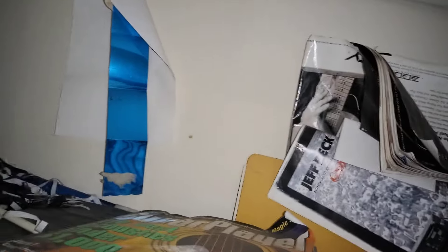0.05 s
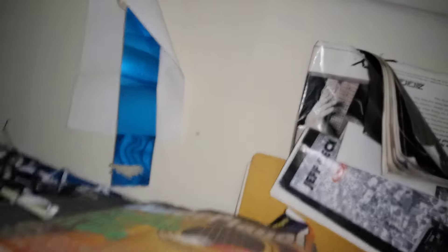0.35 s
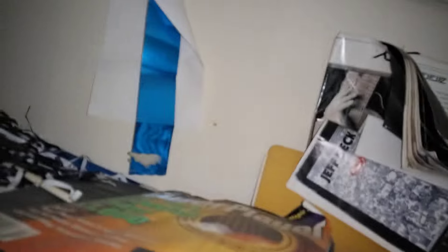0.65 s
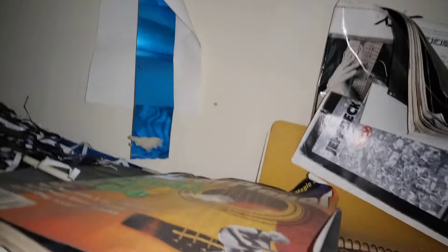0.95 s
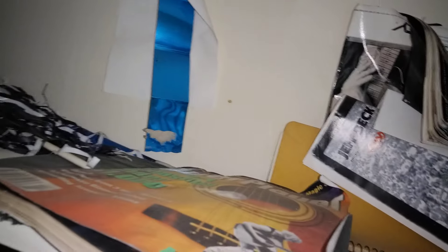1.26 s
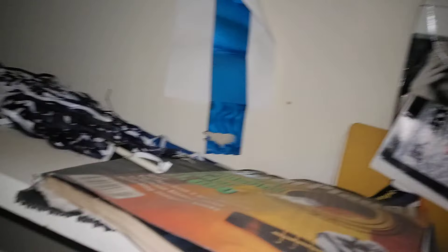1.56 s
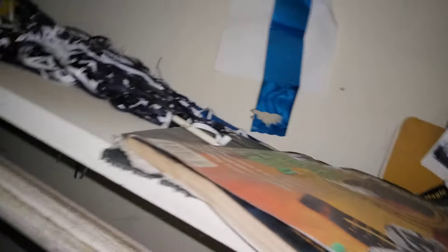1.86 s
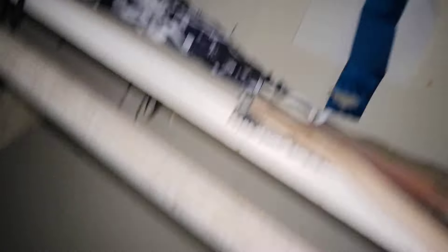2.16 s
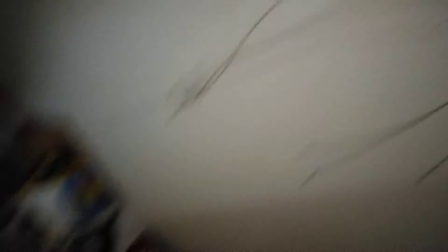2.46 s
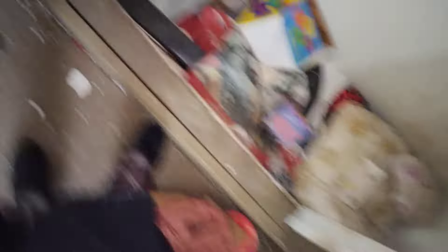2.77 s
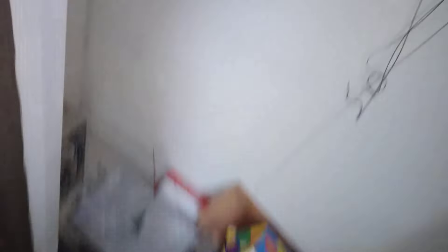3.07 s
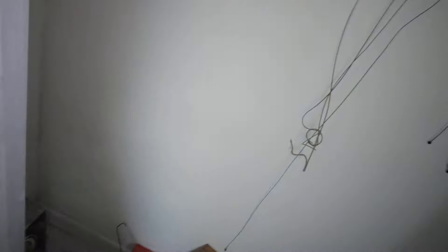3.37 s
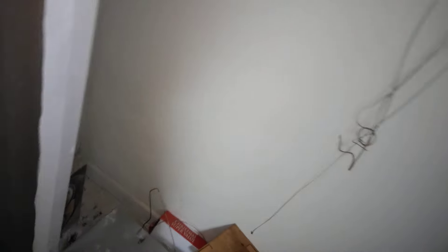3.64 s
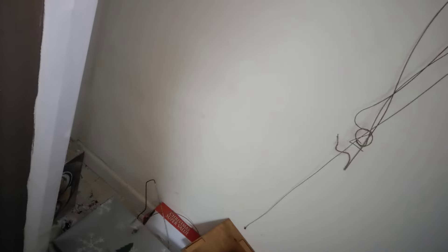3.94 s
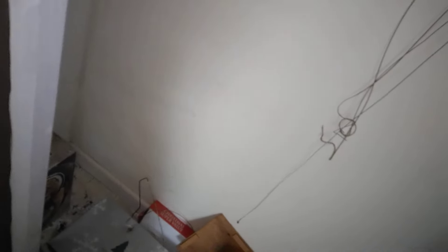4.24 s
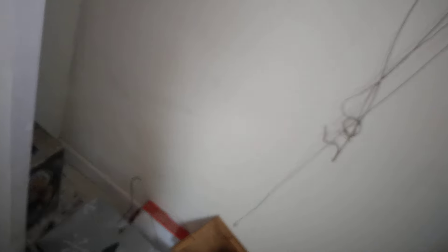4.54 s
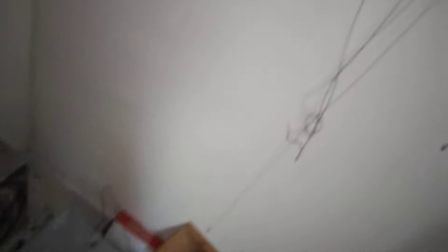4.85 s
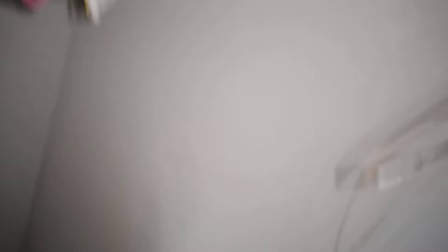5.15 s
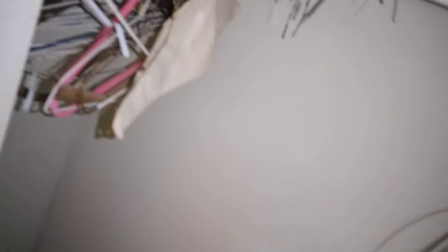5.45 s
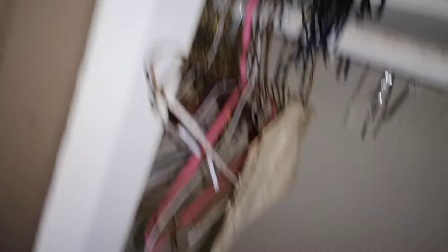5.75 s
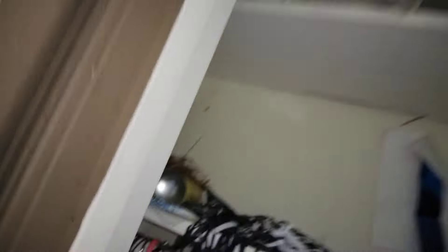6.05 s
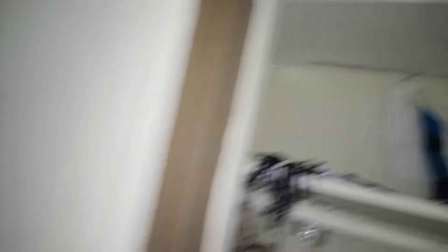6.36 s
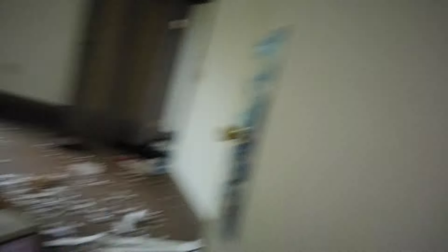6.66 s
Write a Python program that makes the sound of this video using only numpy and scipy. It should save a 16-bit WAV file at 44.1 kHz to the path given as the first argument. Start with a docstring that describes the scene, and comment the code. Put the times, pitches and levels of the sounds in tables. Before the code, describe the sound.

Plastic things tumble, magazines slide, clothes rustle and hangers clatter as someone rummages through a small closet.

```python
"""Rummaging in a small closet, a phone in one hand: plastic things tumble on a shelf, a metal piece bounces,
a box knocks, boards thud, hangers clack and clatter on their rail. A blow is a click, a rattle and ringing
modes. Magazines slide and clothes rustle by stick and slip, their creases snapping. Short delayed copies
from the phone, the hand and nearby surfaces make the sound hollow; the walls echo.
Fingers tap and rub the phone's case, mostly at the end."""
import sys
import numpy as np
from scipy import signal
from scipy.fft import rfft, irfft, next_fast_len
from scipy.io import wavfile

SR = 44100
rng = np.random.default_rng(int(sys.argv[2]) if len(sys.argv) > 2 else 0)


def put_to_file(sound):
    """Save the sound as 16-bit audio at rate SR, in the file named by the first command-line argument."""
    columns = np.atleast_2d(sound).T  # one column per channel
    safe = np.clip(columns, -1, 1)
    whole_steps = np.round(safe * 32767)
    wavfile.write(sys.argv[1], SR, whole_steps.astype(np.int16))


N = 304731

# short delayed copies from phone, hand and nearby surfaces: left_ms, left_db, right_ms, right_db
SHORT_DELAYS = [(0.884, -31.5, 0.9, -28.5), (1.519, -22.5, 2.3, -25), (3.265, -26.5, 1.2, -24),
                (4.671, -26, 2.1, -25), (10.113, -22.5, 4.2, -22.5)]


def amp(db):
    return 10 ** (np.asarray(db) / 20)


def panned(level_db, pan_db):
    """Stereo gains; pan_db is left minus right."""
    return amp(level_db + np.array([[pan_db], [-pan_db]]) / 2)


def read(points, hz):
    """Interpolates (freq_hz, value) points on a log-frequency axis."""
    f, value = np.transpose(points)
    return np.interp(np.log(hz + 1), np.log(f + 1), value)


def unit(x):
    """Unit energy per channel."""
    return x / np.sqrt((x ** 2).sum(-1, keepdims=True) + 1e-20)


def decay(t, t60_s):
    return np.exp(-np.log(1000) * t / t60_s)


def add(mix, start_s, sound):
    part = mix[:, max(round(start_s * SR), 0):][:, :sound.shape[1]]
    part += sound[:, :part.shape[1]]


def colour(x, points, size=4096):
    """Causal filter from (freq_hz, gain_db) points."""
    log_gain = np.log(amp(read(points, abs(np.fft.fftfreq(size, 1 / SR)))))
    taps = np.fft.ifft(np.exp(np.conj(signal.hilbert(log_gain)))).real[:size // 2]
    return signal.oaconvolve(x, taps[None], axes=1)[:, :x.shape[1]]


def diffuse(count):
    """White noise at two microphone ports: alike in the bass, unrelated in the treble."""
    likeness = [(60, 1), (220, 0.6), (450, 0.3), (900, .05), (4000, 0)]  # between ports: freq_hz, correlation
    size = next_fast_len(count)
    a, b = rfft(rng.standard_normal((2, size)))
    same = read(likeness, np.fft.rfftfreq(size, 1 / SR))
    return irfft(np.array([a, same * a + np.sqrt(1 - same ** 2) * b]), size)[:, :count]


def wander(count, rate_hz):
    """Gaussian random points at rate_hz, joined by lines."""
    at = np.arange(count) * rate_hz / SR
    return np.interp(at, np.arange(count), rng.standard_normal(count))


def ring(waves):
    """Sums modes; the place of a blow sets each one's phase at each port, here at random."""
    return (np.exp(2j * np.pi * rng.random((2, len(waves)))) @ waves).real


def strike(blows, modes, ring_db, click_db, grain_db, lead_ms, rise_ms, sub_db, bass_db, pan_db,
           t60_scale=1, size=16384):
    """Contact click, dying rattle of tiny contacts and ring; t60_scale < 1: a hand or neighbour damps it."""
    out, t = np.zeros((2, N)), np.arange(size) / SR
    mode_hz, mode_db, mode_t60_s = np.transpose(modes)[:, :, None]
    waves = np.exp(2j * np.pi * mode_hz * t) * decay(t, mode_t60_s * t60_scale)
    waves *= amp(mode_db + ring_db) / np.linalg.norm(waves.real, axis=1, keepdims=True)
    arrival_s = .001 + np.array([[-lead_ms], [lead_ms]]) / 2000
    click = amp(click_db) * np.sinc((t - arrival_s) * SR)
    rise = 1 - np.exp(-t * 1000 / rise_ms)
    for start_s, level_db, weight_db, treble_db, t60_s in blows:
        rattle = diffuse(size) * amp(grain_db * wander(size, 900)) * decay(t, t60_s)
        hit = unit(unit(rattle * rise) + click + ring(waves) * rise) * np.sqrt(SR / 100)
        low_db = weight_db + bass_db  # a heavy, soft blow lifts body and bass against 2 kHz
        hardness = [(35, low_db + sub_db), (110, low_db - 4.5), (250, low_db + 4),
                    (680, weight_db), (2000, 0.0026), (5500, treble_db)]
        add(out, start_s, colour(hit, hardness) * panned(level_db, pan_db))
    return out


def crowded_modes(x, ripple_db, spacing_hz):
    """Many short, overlapping modes of a light, irregular object: fixed treble peaks and notches."""
    hz = np.arange(1, 401) * spacing_hz
    depth_db = ripple_db * np.clip((hz - 700) / 2000, 0, 1)
    draws = np.clip(rng.standard_normal(len(hz)), -2.5, 1.5)
    gain_db = depth_db * draws - depth_db ** 2 * np.log(10) / 25
    return colour(x, np.column_stack([hz, gain_db]))


def comb(x, delays, strength_db):
    """Short delayed copies, from the phone and hand as well as nearby surfaces, make the sound hollow."""
    rows, lag = np.array(delays), np.arange(512)
    ms, db = rows[:, ::2].T[:, :, None], rows[:, 1::2].T[:, :, None]
    taps = (amp(db + strength_db) * np.sinc(lag - ms * SR / 1000)).sum(1) + (lag == 0)
    return signal.oaconvolve(x, unit(taps), axes=1)[:, :N]


def strokes(start_s, length_s, level_db, rise_db_per_s, fall_db_per_s, arch_db):
    """Rubbing envelope: each stroke gathers speed, peaks midway and dies away."""
    t = np.arange(0, N, 64)[:, None] / SR
    early_s, late_s = np.maximum(start_s - t, 0), np.maximum(t - start_s - length_s, 0)
    off_centre = np.clip(2 * (t - start_s) / length_s - 1, -1, 1)
    each = amp(level_db - arch_db * off_centre ** 2 - rise_db_per_s * early_s - fall_db_per_s * late_s)
    return np.interp(np.arange(N) / SR, t[:, 0], np.linalg.norm(each, axis=1))


def crinkle(snaps_per_s=45, snap_db=-2.5, spread_db=3.5, decay_s=.0015):
    """Gain of a rubbed sheet: one, with a brief leap as each crease snaps."""
    sizes = amp(snap_db + spread_db * np.minimum(rng.exponential(1, N), 2))
    snaps = sizes * (rng.random(N) < snaps_per_s / SR)
    return 1 + signal.lfilter([1], [1, -np.exp(-1 / (decay_s * SR))], snaps)


def quiet_house():
    """Steady, faint, bass-heavy noise."""
    spectrum = [(20, -62), (70, -63.5), (200, -72), (600, -80.5), (2000, -86), (8000, -92), (16000, -100)]  # freq_hz, gain_db
    return colour(diffuse(N), spectrum)


def sliding_magazines(grain_db=2, flutter_db=1.5, pan_db=-1):
    """Paper and plastic stick and slip: grainy surface hiss, hollow drumming of the shelf."""
    slides = [(0.012, 0.46, -48, -43), (0.826, 0.081, -45, -51), (0.996, 0.11, -48, -70),
              (1.208, 0.056, -41.5, -32.5), (1.444, 0.055, -38, -29.5), (1.528, 0.072, -41.5, -26.5),
              (1.67, 0.12, -47.5, -44.5), (1.769, 0.029, -28.5, -17), (1.83, 0.028, -26, -12),
              (2.055, 0.07, -63.5, -43.5), (2.245, 0.035, -51, -42), (3.104, 0.26, -52.5, -51.5),
              (3.55, 0.06, -39.5, -66), (4.28, 0.053, -53, -74), (4.342, 0.12, -39.5, -40),
              (4.49, 0.31, -48, -41), (5.005, 0.027, -51, -65), (5.079, 0.13, -56.5, -39),
              (5.261, 0.021, -48, -59), (5.56, 0.3, -66, -59), (6.26, 0.23, -61.5, -57.5),
              (6.53, 0.032, -55.5, -48), (6.686, 0.1, -49, -45), (6.831, 0.048, -31.5, -31.5)]  # start_s, length_s, hiss_db, shelf_db
    hiss_spectrum = [(100, -22), (600, -7), (1600, -2.5), (2400, -1.5), (3600, -2), (7000, -2), (10000, 0),
                     (16000, 3)]  # freq_hz, gain_db
    shelf_spectrum = [(25, -21), (55, -16), (90, -9), (135, -8), (205, 5.5), (245, 0.5), (290, 10),
                      (350, -1), (460, -1), (635, 2.5), (780, -1.5), (880, -1), (1400, -7.5), (8000, -48.5)]  # freq_hz, gain_db
    sides = [(0, 3.5), (1.9, -1), (2.6, -4), (4.4, -1.5), (6.3, 1), (6.7, -1.5), (6.84, -13)]  # ends with a finger at the right port: time_s, pan_db
    start_s, length_s, hiss_db, shelf_db = np.transpose(slides)
    shape = dict(rise_db_per_s=420, fall_db_per_s=260, arch_db=2.5)
    grip = amp(flutter_db * wander(N, 90))  # tightens and lets go
    grain = amp(grain_db * wander(N, 2500))
    slips = diffuse(N) * grain * grip * strokes(start_s, length_s, hiss_db - 1.5, **shape)
    pushes = diffuse(N) * grip * strokes(start_s, length_s, shelf_db - 3.5, **shape)
    side_db = pan_db + np.interp(np.arange(N) / SR, *np.transpose(sides))
    ports = amp(np.array([side_db, -side_db]) / 2)
    ports /= np.sqrt((ports ** 2).mean(0))
    return (colour(slips * crinkle(), hiss_spectrum) + colour(pushes, shelf_spectrum)) * ports


def plastic_pile():
    """Plastic things tumble on the shelf, damping each other."""
    blows = [(0.033, -46, 13, 1, 0.15), (0.101, -43, 14, 2, 0.12), (0.165, -44.5, 12.5, -4.5, 0.14),
             (0.237, -38, 4, 1, 0.09), (0.2595, -25.5, 3.5, 14.5, 0.089), (0.273, -5, -0.5, -0.5, 0.21),
             (0.287, -6, -0.5, -15, 0.14), (0.333, -23, 9.5, -3, 0.06), (0.362, -20, 11, -7.5, 0.47),
             (0.4, -22, 6.5, -1.5, 0.36), (0.4335, -9, 3, -9.5, 0.097), (0.452, 2, -6.5, -6.5, 0.2),
             (0.48, -3.5, -8, -12, 0.38), (0.534, -6, -4, -4.5, 0.1), (0.812, -36.5, 13, -41, 0.21),
             (0.918, -43.5, 13.5, -6, 0.18)]  # start_s, level_db, weight_db, treble_db, rattle_t60_s
    modes = [(208.6, -3, 0.5), (295, 1, 0.42), (363, -6.5, 0.16), (443, -4.5, 0.17), (664, 3, 0.33),
             (857, -5.5, 0.75), (1254, -6.5, 0.87), (1490, 0, 0.16), (1690, -3, 0.28), (1844, -4.5, 0.12),
             (2082, 1, 0.55), (2130, -2.5, 0.32), (2640, -2.5, 0.27), (3600, -4, 0.17), (4500, -1, 0.22),
             (4670, -3, 0.19), (4631, -6, 0.28), (5530, -5, 0.29), (5700, -7.5, 0.64), (5900, -2.5, 0.57),
             (7919, -6.5, 0.28), (8240, -4.5, 0.28)]  # pitch_hz, level_db, undamped_t60_s
    hits = strike(blows, modes, ring_db=-22.5, click_db=-11, grain_db=3, lead_ms=0.55, rise_ms=0.83,
                  sub_db=-21, bass_db=0, pan_db=-1, t60_scale=0.73)
    hits = crowded_modes(hits, ripple_db=3, spacing_hz=95)
    return comb(hits, SHORT_DELAYS, strength_db=2.5)


def closet_echo(x, onset_s=0.0059, size=49152):
    """Dense tail from the close walls."""
    spectrum = [(60, 5.5), (130, -7), (240, -5.5), (650, -4.5), (2000, -9.5), (7000, -8.5), (15000, -27.5)]  # freq_hz, gain_db
    decay_times = [(80, 0.99), (240, 0.33), (650, 0.51), (2000, 0.57), (6000, 0.37), (14000, 0.98)]  # freq_hz, t60_s
    hz, t, bands = signal.stft(diffuse(size), SR, nperseg=512)
    fade = unit(decay(t, read(decay_times, hz)[:, None]))
    bands *= fade * amp(read(spectrum, hz))[:, None] * np.sqrt(len(t) / size)
    tail = signal.istft(bands, SR, nperseg=512)[1]
    tail *= np.clip(np.arange(tail.shape[1]) / SR / onset_s, 0, 1) ** 2
    return signal.fftconvolve(x, tail, axes=1)[:, :N]


def metal_piece(scrape_db=-4.5, scrape_t60_s=0.096, size=16384):
    """A few bounces, each a bright scrape that rings the same high modes."""
    bounces = [(.605, -30), (0.609, -20.5), (0.623, -22), (.631, -30.5)]  # start_s, level_db
    modes = [(5830, -7.5, 0.29), (6130, -3, 0.062), (5886, -1.5, 0.079), (6420, -16.5, 0.24),
             (7060, -15, 0.11), (9500, -23, 0.12), (11300, -12, 0.12), (12300, -3, 0.09)]  # pitch_hz, level_db, t60_s
    out, t = np.zeros((2, N)), np.arange(size) / SR
    mode_hz, mode_db, t60_s = np.transpose(modes)[:, :, None]
    waves = amp(mode_db) * np.exp(2j * np.pi * mode_hz * t) * decay(t, t60_s)
    for start_s, level_db in bounces:
        scrape = colour(diffuse(size), [(2000, -25), (6000, -1)]) * amp(scrape_db) * decay(t, scrape_t60_s)
        add(out, start_s, amp(level_db) * (scrape + ring(waves)))
    return out


def box_knocks():
    """Sharp contacts ring a box's short modes."""
    blows = [(1.125, -66.5, 8, 21, 0.17), (1.315, -38, 0.5, -12, 0.13), (2.063, -48.5, -1.5, -11, 0.24),
             (2.158, -50, 7, -3, 0.17), (2.222, -67, 2, 11, 0.023), (2.672, -49.5, 16, -13, 0.043),
             (3.235, -46.5, 9, 1, 0.027), (3.25, -40.5, 17.5, 3.5, 0.044), (3.292, -13, 5.5, -14, 0.069),
             (3.396, -33, 21.5, 3, 0.064), (3.704, -38, -5, -5.5, 0.16), (5.399, -53, 13.5, 3.5, 0.015),
             (6.073, -26.5, 6, -16, 0.032), (6.113, -45, 22, 9.5, 0.034), (6.235, -43.5, 11.5, -8.5, 0.013)]  # start_s, level_db, weight_db, treble_db, rattle_t60_s
    modes = [(370, -0.5, 0.041), (552, 0, 0.084), (666, -3.5, 0.076), (1193, -22, 0.11),
             (1915, -2.5, 0.031), (2660, -2, 0.0157), (3517, 3.5, 0.016), (5900, -21, 0.054),
             (7280, 3.5, 0.015)]  # pitch_hz, level_db, t60_s
    body = [(800, -2.5), (1110, -3), (1260, 0.5), (1550, -16), (1930, 3.5), (2550, -5), (3000, 4),
            (4800, 0), (6500, 1)]  # freq_hz, gain_db
    delays = [(1.519, -23, 0.64, -17), (2.268, -35, 1.35, -66), (3.129, -19, 1.6, -2.5),
              (3.333, -22, 3.8, 14), (5.193, -30, 2.7, -28)]  # left_ms, left_db, right_ms, right_db
    hits = strike(blows, modes, ring_db=-16, click_db=-3, grain_db=-1, lead_ms=-0.28, rise_ms=0.17,
                  sub_db=-26.5, bass_db=-3, pan_db=-4)
    return comb(colour(hits, body), delays, strength_db=5.5)


def clothes(grain_db=3, flutter_db=1.4):
    """Cloth drags over cloth as the body turns: a soft, grainy swish."""
    swishes = [(2.36, 0.65, -48), (3.196, 0.47, -47), (3.726, 0.22, -65)]  # start_s, length_s, level_db
    spectrum = [(40, -8.5), (100, 1.5), (170, -2), (380, 8.5), (600, 5), (1100, -1.5), (3000, 2.5),
                (4200, -4), (10000, -3.5), (16000, 0.5)]  # freq_hz, gain_db
    speed = strokes(*np.transpose(swishes), rise_db_per_s=198, fall_db_per_s=130.5, arch_db=5)
    fibres = diffuse(N) * amp(grain_db * wander(N, 2500) + flutter_db * wander(N, 70))
    return colour(fibres * speed * crinkle(), spectrum) * panned(level_db=-2.5, pan_db=-3)


def case_taps():
    """Fingers click on the phone's case, near the right port."""
    blows = [(2.373, -48, 14.5, 5, 0.0062), (6.39, -26, 11, 1, 0.0054), (6.698, -45, 9, -3, 0.018),
             (6.74, -37.5, 7.5, 7, 0.012), (6.83, -24, 3, 6, 0.023), (6.839, -30.5, -8, 15.5, 0.069),
             (6.878, -32.5, 19.5, 15, 0.031), (6.899, -35, 8, -14, 0.0088)]  # start_s, level_db, weight_db, treble_db, rattle_t60_s
    modes = [(198, 18, 0.018), (420, -46, .015), (6800, -4, .006)]  # pitch_hz, level_db, t60_s
    return strike(blows, modes, ring_db=-29, click_db=1.5, grain_db=5.5, lead_ms=-0.091, rise_ms=1,
                  sub_db=-13, bass_db=-1.5, pan_db=-15)


def soft_bumps(swell_s=0.0052, size=8192):
    """The hand or shifting feet swing the phone for a cycle or two."""
    pushes = [(2.694, -58.5, 219), (2.728, -54.5, 100), (3.762, -67, 101), (3.839, -64, 103),
              (6.429, -57.5, 77.5), (6.553, -53, 91.2), (6.643, -53.5, 98), (6.665, -47.5, 100),
              (6.779, -50, 152), (6.797, -49, 172), (6.881, -38, 107), (6.902, -25, 187)]  # peak_s, level_db, pitch_hz
    out, t = np.zeros((2, N)), np.arange(size) / SR
    swell = t / swell_s * np.exp(1 - t / swell_s)
    for peak_s, level_db, pitch_hz in pushes:
        swing = swell * np.sin(2 * np.pi * pitch_hz * t)
        add(out, peak_s - swell_s, swing * panned(level_db + 0.5, pan_db=-16.5))
    return out


def hanger_clacks():
    """Hangers clack with a damped ring."""
    blows = [(4.337, -25.5, -6.5, 0, 0.14), (4.546, -14, 0, 8, 0.051), (4.569, -19.5, 4.5, 8, 0.14),
             (4.818, -37.5, 12.5, -4, 0.1), (4.833, -43, 16.5, 8, 0.17), (4.877, -34, 11.5, 1, 0.22),
             (4.909, -34.5, -12, 6.5, 0.017)]  # start_s, level_db, weight_db, treble_db, rattle_t60_s
    modes = [(366.4, -9, 1), (669.7, -1.5, 0.39), (887, -1, 0.77), (1043, -3, 1), (1350, -3, 0.55),
             (2060, -11, 0.91), (2150, 0.5, 0.51), (2280, -7.5, 0.28), (3120, 1.5, 0.1), (3236, -8, 0.33),
             (2674, -2.5, 0.38), (3540, 7.5, 0.13), (3800, -11.5, 0.56), (4530, -2, 0.097),
             (4500, -8, 0.34), (5500, -4, 0.61), (5830, -7.5, 0.31), (6530, 4, 0.21), (7750, -9, 0.26),
             (8700, -3, 0.47), (9260, -13, 0.24)]  # pitch_hz, level_db, undamped_t60_s
    delays = [(0.883, -23, 0.904, -15.5), (1.111, -17, 1.3, -16.5), (1.315, -12.5, 1.9, -7),
              (1.519, -10.5, 1.519, -35), (1.723, -23, 4.9, -22.5)]  # left_ms, left_db, right_ms, right_db
    hits = strike(blows, modes, ring_db=-18, click_db=-24, grain_db=0, lead_ms=0.78, rise_ms=0.83,
                  sub_db=-13, bass_db=-8, pan_db=-4.5, t60_scale=0.45)
    hits = crowded_modes(hits, ripple_db=4.5, spacing_hz=95)
    return comb(hits, delays, strength_db=-4)


def board_thuds():
    """Low board modes with a slow attack."""
    blows = [(5.092, -36.5, 11.4, -17.5, 0.12), (5.21, -47, 2.3, -6, 0.06),
             (5.424, -54.5, 17.3, -1.5, 0.21)]  # start_s, level_db, weight_db, treble_db, rattle_t60_s
    modes = [(262.8, -1.5, 0.31), (392, -12.5, 0.4), (523.4, -1.5, 0.17), (583, -2.5, 0.2),
             (769, 2.5, 0.18), (904, -12.5, 0.3)]  # pitch_hz, level_db, t60_s
    return strike(blows, modes, ring_db=-11.5, click_db=-13.5, grain_db=0, lead_ms=.1, rise_ms=8.9,
                  sub_db=-16, bass_db=-3.5, pan_db=-1)


def rail_clatter():
    """The row of hangers clatters on its rail."""
    blows = [(5.742, -7, -5, -10, 0.22), (5.761, -9.5, 0.5, -0.5, 0.23), (5.863, -31.5, 15.5, 1, 0.16),
             (5.907, -26.5, -9, -1.5, 0.3), (5.962, -2, -23, -24, 0.14), (5.968, -9, 4, -3.5, 0.1),
             (5.981, -17.5, 9.5, 7.5, 0.26), (6.012, -13, 3.5, 2, 0.28), (6.05, -17.5, 0.5, 1, 0.26)]  # start_s, level_db, weight_db, treble_db, rattle_t60_s
    modes = [(728, 0, 0.75), (1037, 5.5, 0.45), (1317, -7, 0.17), (1430, 6.5, 0.1), (1484, 2, 0.32),
             (2070, -0.5, 0.69), (2780, -5, 0.26), (2710, -6, 0.31), (4180, -13, 0.233), (5380, 1, 0.15),
             (5930, -10, 0.25), (6000, -16.5, 0.22), (5930, -3.5, 0.21), (6550, -0.5, 0.2), (7660, 4, 0.18),
             (9100, -1, 0.23), (9600, 6.5, 0.19), (9980, 10, 0.12), (10600, 3, 0.2), (10000, -12.5, 0.21),
             (10200, -7, 0.2), (10966, 9, 0.18)]  # pitch_hz, level_db, undamped_t60_s
    body = [(1000, -1), (1500, 0.5), (2600, 0), (2950, -6.5), (3300, 0.5), (4700, -4), (5000, -6.5),
            (5400, -0.5), (7800, 0), (8150, -5), (8600, -1)]  # freq_hz, gain_db
    delays = [(0.907, -20, 1.9, -27), (1.134, -19, 1.111, -24), (1.406, -17, 1.33, -17),
              (1.633, -26, 1.61, -15.5), (2.948, -18.5, 5.329, -13)]  # left_ms, left_db, right_ms, right_db
    hits = strike(blows, modes, ring_db=-24.5, click_db=-27.5, grain_db=0.5, lead_ms=0.81, rise_ms=0.89,
                  sub_db=-27, bass_db=-7, pan_db=0, t60_scale=0.57)
    hits = crowded_modes(hits, ripple_db=4.5, spacing_hz=90)
    return comb(colour(hits, body), delays, strength_db=3)


def scene():
    """The handled things, the closet around them and the quiet house."""
    pile, box, hangers = plastic_pile(), box_knocks(), hanger_clacks()
    board, rail = board_thuds(), rail_clatter()
    rubbing = crowded_modes(sliding_magazines() + clothes(), ripple_db=3, spacing_hz=80)
    rubbing = comb(rubbing, SHORT_DELAYS, strength_db=6.5)
    send = amp(-4) * pile + amp(-10) * box + amp(-3.5) * hangers + amp(-4.5) * board + amp(-6.5) * rail
    things = pile + metal_piece() + box + hangers + board + rail
    handling = amp(-7) * case_taps() + soft_bumps()
    return quiet_house() + rubbing + things + closet_echo(send) + handling


def record(dry, ceiling=.75, edge_hz=15750):
    """Each port's colour, soft overload on the tallest peaks, then the band limit."""
    left_port = [(100, -2.5), (700, -0.5), (1900, -2.5), (2400, -3), (3100, -3.5), (4500, -1), (7000, 0.5),
                 (9500, 2), (11000, 0), (12200, -7), (15500, -11)]  # freq_hz, gain_db
    right_port = [(100, -2), (700, -2), (1100, -4.5), (1900, 0.5), (2500, 0.5), (3100, -3), (4100, -2),
                  (6300, 1.5), (8000, -2.5), (10000, -9), (12200, -17), (15500, -19.5)]  # freq_hz, gain_db
    heard = np.vstack([colour(dry[:1], left_port), colour(dry[1:], right_port)])
    heard /= (1 + (heard / ceiling) ** 4) ** .25
    lowpass = signal.firwin(255, edge_hz, window=("kaiser", 9), fs=SR)
    return signal.oaconvolve(heard, lowpass[None], "same")


dry = scene()
out = record(dry)
put_to_file(out)
```